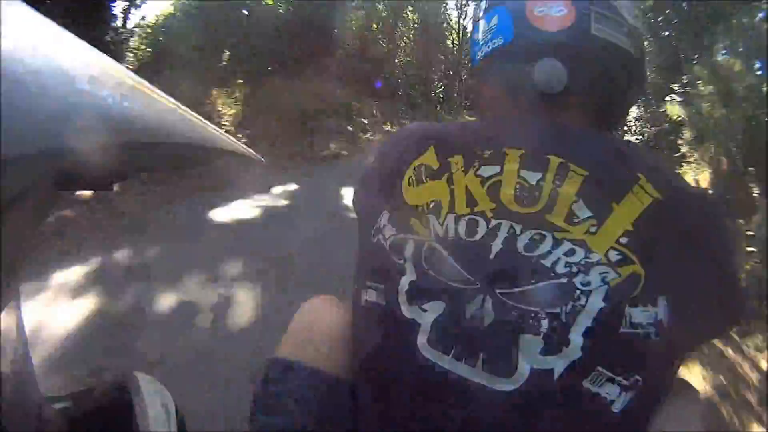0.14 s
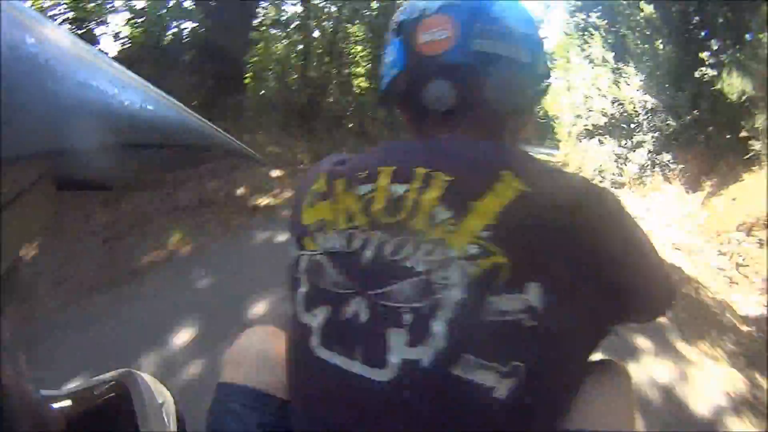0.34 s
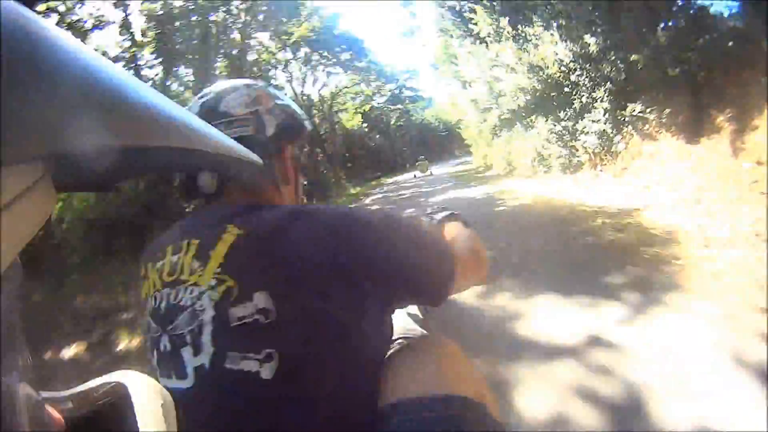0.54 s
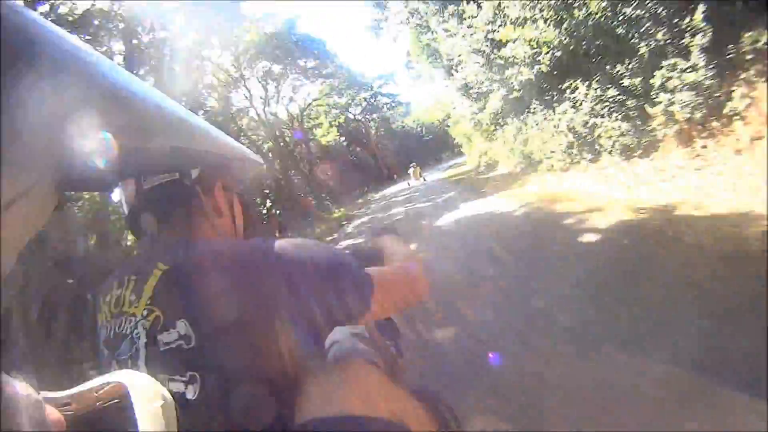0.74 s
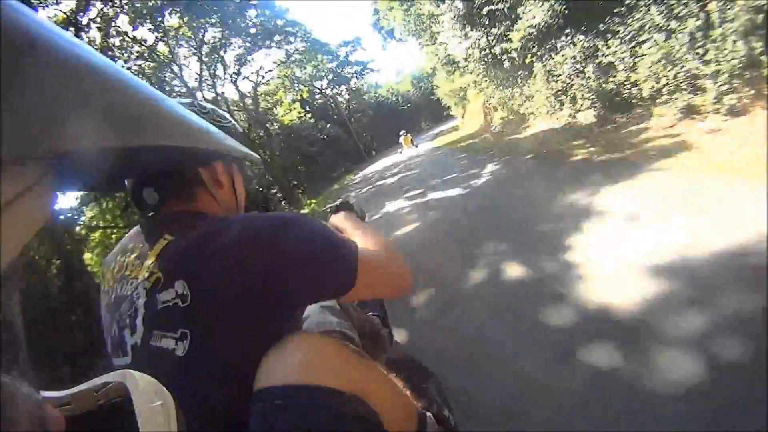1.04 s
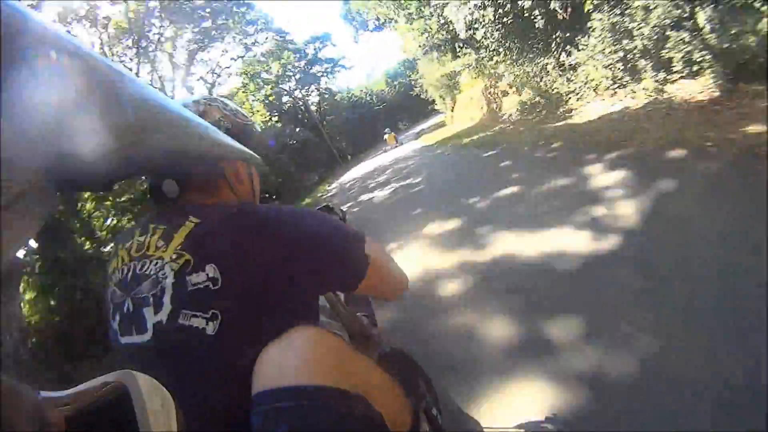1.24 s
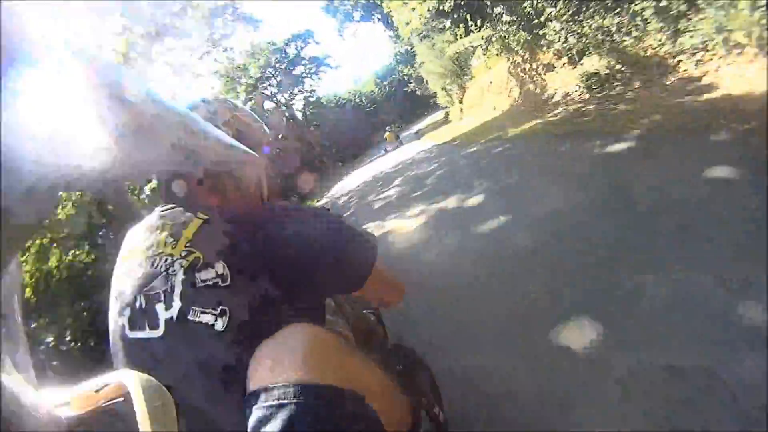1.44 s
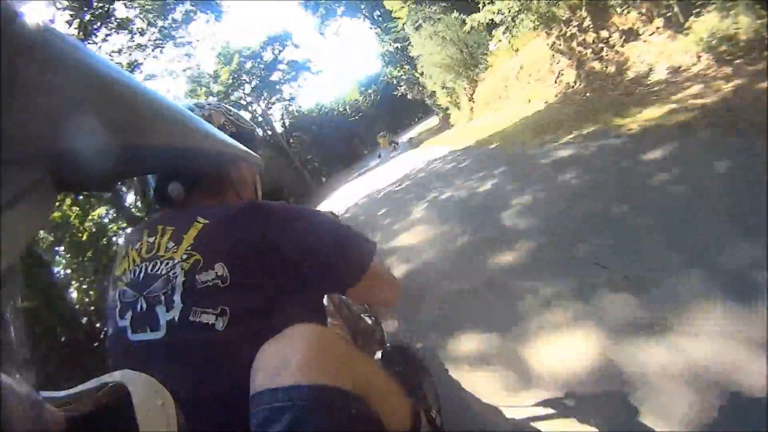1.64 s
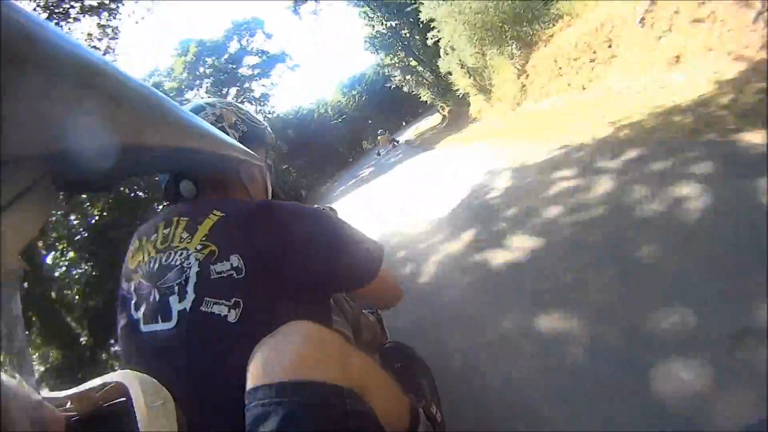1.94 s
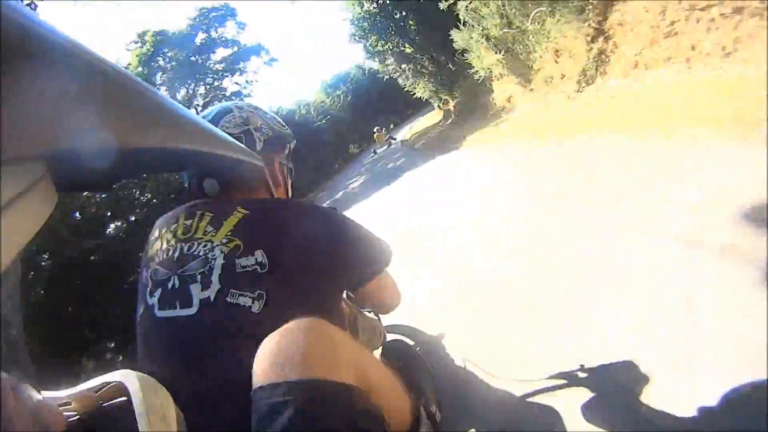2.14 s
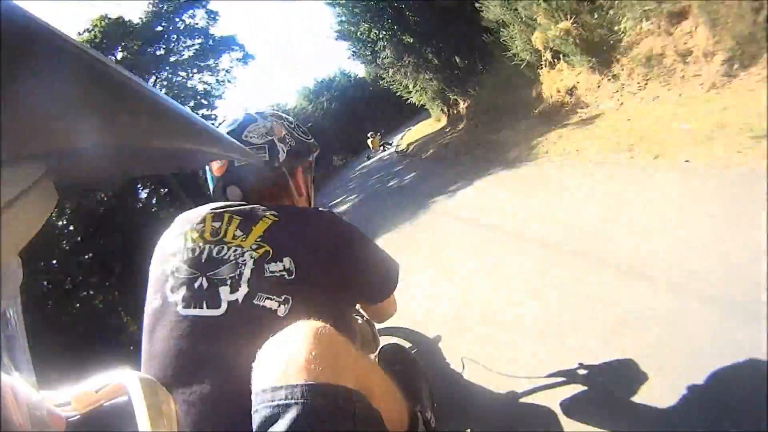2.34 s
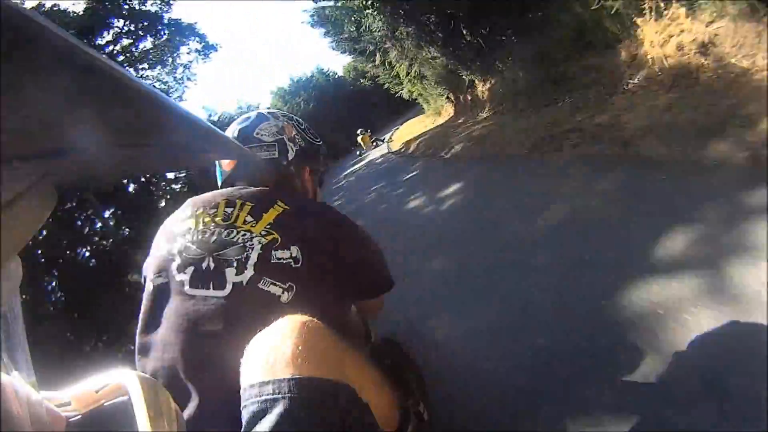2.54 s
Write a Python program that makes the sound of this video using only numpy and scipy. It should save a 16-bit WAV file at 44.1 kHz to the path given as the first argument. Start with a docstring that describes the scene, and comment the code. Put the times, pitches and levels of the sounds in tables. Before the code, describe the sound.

Hard wheels of a small trike roll fast on pavement throughout, a dense, nasal, gritty mid-range roar heard right at the frame outdoors. Hollow knocks cluster at 0.2-0.4 s; bright grit ticks scatter at 0.5-0.75 s as the high whine and hiss grow. Low frame rumble and drone swell around 0.9 s. Strong knocks return at 1.8-2.1 s, a faint one at 2.4 s, over gusty wind and deep wavering sway.

```python
"""A small trike with hard plastic wheels rolls fast down a paved road, heard from a microphone pair on its frame.
Road grit shakes wheels, frame and housing: random contacts through broad resonances give roar and high whine.
Bumps knock the mount with jolts, snaps and hollow rings; loose grit ticks in short noise bursts.
Behind them the frame rumbles, drones and hums, the mount sways as a low tone, and noise bands
make the wind in each port."""
import sys
import numpy as np
from scipy import signal
from scipy.io import wavfile

SR = 44100
rng = np.random.default_rng(int(sys.argv[2]) if len(sys.argv) > 2 else 0)


def dump_mix(stems):
    """Bounce the given channels to the path in sys.argv[1] as a 16-bit WAV at rate SR."""
    frames = np.atleast_2d(stems).T  # one column per channel
    limited = np.clip(frames, -1, 1)  # hard clip at full scale
    pcm = np.round(limited * 32767).astype(np.int16)
    wavfile.write(sys.argv[1], SR, pcm)


N = 119070


def from_db(db):
    """Decibels to gain."""
    return 10 ** (np.asarray(db) / 20)


def rms_one(x):
    """Scales to unit rms."""
    return x / np.sqrt(np.mean(np.abs(x) ** 2) + 1e-20)


def over_time(rows):
    """Columns of a table as curves over time, straight between the rows."""
    seconds, *columns = np.transpose(rows)
    return [np.interp(np.arange(N) / SR, seconds, column) for column in columns]


def drift(rate_hz):
    """Slow random curve of spread 1: noise through two equal low-pass poles at rate_hz."""
    step = 40  # samples between the points of the curve
    pole = np.exp(-2 * np.pi * rate_hz * step / SR)
    noise = rng.standard_normal(N // step + 2002)
    slow = signal.lfilter([1], [1, -2 * pole, pole * pole], noise)[2000:]  # settled part only
    return np.interp(np.arange(N) / step, np.arange(len(slow)), rms_one(slow))


def band_pass(low_hz, high_hz, x):
    """Keeps one band of a sound."""
    return signal.sosfilt(signal.butter(2, [low_hz, high_hz], "band", fs=SR, output="sos"), x)


def add(out, start_s, sound):
    """Adds a stereo sound at a time."""
    i = int(start_s * SR)
    out[:, i:i + sound.shape[1]] += sound


SETTLE = 8000  # samples of grit played before the sound begins
GRIT_PER_S, GRIT_SPREAD_DB = 9000, 2.32


def grit():
    """Dense random road contacts of uneven size and either sign."""
    count = N + SETTLE
    size_db = GRIT_SPREAD_DB * np.minimum(rng.exponential(1, count), 5)
    contacts = from_db(size_db) * rng.choice([-1, 1], count)
    return contacts * (rng.random(count) < GRIT_PER_S / SR)


def resonate(hz, width_hz):
    """Grit through a resonance applied twice, as a complex signal of rms 1."""
    pole = np.exp((2j * np.pi * hz - np.pi * width_hz) / SR)
    return rms_one(signal.lfilter([1], [1, -2 * pole, pole * pole], grit())[SETTLE:])


def shaken(modes, level_db, patchy_db, flicker_hz, alike, damped=0.):
    """Both ports hear each resonance with their own gain and phase; strong swings are damped more.

    patchy_db is the spread of each of two level drifts, one common to all resonances and one of its own;
    alike is the share of the left sound that the right port hears, 1 being all of it."""
    out, together = np.zeros((2, N)), drift(flicker_hz)
    for hz, width_hz, left_db, right_db, lead in modes:
        left = resonate(hz, width_hz)
        left = rms_one(left / (np.abs(left) + .2) ** damped)
        right = left * np.exp(1j * lead)
        if alike < 1:
            right = alike * right + np.sqrt(1 - alike ** 2) * resonate(hz, width_hz)
        patches = from_db(patchy_db * (together + drift(flicker_hz)))
        gain = np.sqrt(2) * patches  # the real part alone has half the power
        out += [from_db(left_db) * gain * left.real, from_db(right_db) * gain * right.real]
    return out * from_db(level_db)


# Wind at the microphone ports, shape of its spectrum.
# Each row: frequency in Hz, relative density in dB per Hz.
WIND_SPECTRUM = [(59, -45), (100, -17.5), (765, -19), (1090, -28.5), (1550, 0.5), (1840, -28.5),
                 (4200, -24.5), (5000, -34.5), (10700, -65), (13900, -89), (22000, -120)]
WIND_DB, WIND_GUST_DB = -27, 1.87
WIND_FOLLOWS = 0.42  # share of the drone's swing in dB


def wind(drone_db):
    """Half-octave bands of noise, unrelated in the two ports, gusting and partly following the drone's level."""
    out, together = np.zeros((2, N)), drift(21)
    edges = 128 * 2 ** np.arange(0, 6.6, .5)
    white = rng.standard_normal((2, 2, N))  # neighbouring bands use different noise
    hz, density_db = np.transpose(WIND_SPECTRUM)
    for k, (low, high) in enumerate(zip(edges, edges[1:])):
        level_db = np.interp(np.log(low * high) / 2, np.log(hz), density_db)
        gust_db = WIND_GUST_DB * (together + drift(36))
        out += from_db(level_db + gust_db) * band_pass(low, high, white[k % 2])
    follow_db = WIND_FOLLOWS * (drone_db - drone_db.mean())
    return from_db(WIND_DB + follow_db) * rms_one(out)


# The microphone mount swaying on its stem.
# Each row: time in seconds, centre of the wavering pitch in Hz, level in dB.
MOUNT_SWAY = [(0.0, 29.7, -37), (0.06, 30.0, -29), (0.23, 31.4, -39), (0.31, 29.0, -32), (0.46, 28, -35),
              (0.52, 28.9, -46), (0.92, 29.3, -36), (0.98, 29.5, -44), (1.17, 29.4, -33), (1.28, 31.2, -49),
              (1.45, 33.6, -32.5), (1.53, 30.1, -35.5), (1.67, 30.2, -29.5), (1.8, 26.6, -31),
              (2.0, 26.4, -25.5), (2.15, 32.3, -37.5), (2.49, 31.5, -28.5), (2.7, 34.3, -39)]
SWAY_WAVER_HZ, SWAY_LEAD = 1.2, .2  # spread of the pitch; radians by which the right port leads


def sway():
    """The mount on its stem: a low, nearly pure tone that wavers in pitch."""
    hz, level_db = over_time(MOUNT_SWAY)
    phase = 2 * np.pi * np.cumsum(hz + SWAY_WAVER_HZ * drift(8.3)) / SR
    return np.sqrt(2) * from_db(level_db) * np.sin(phase + np.array([[0], [SWAY_LEAD]]))


# How hard the frame under the microphones is shaken.
# Each row: time in seconds, hum in dB, hollow drone in dB, low rumble in dB.
FRAME_LEVELS = [(0.0, -37, -38, -35), (0.12, -47, -39.5, -49), (0.17, -37.5, -40, -45),
                (0.42, -43.5, -36, -43), (0.56, -48, -41, -54), (0.62, -65, -40.5, -58),
                (0.66, -32.5, -34, -44.5), (0.91, -30, -30.5, -32.5), (1.09, -40, -34, -46),
                (1.12, -29.5, -38, -33), (1.17, -35, -33, -37), (1.21, -31, -37.5, -56),
                (1.27, -39.5, -32.5, -43.5), (2.04, -36.5, -32, -36.5), (2.32, -37, -34.5, -43),
                (2.41, -35.5, -30.5, -32), (2.63, -36.5, -32, -47.5), (2.7, -51, -31, -36)]


def frame_levels():
    """Level curves of hum, drone and rumble."""
    return over_time(FRAME_LEVELS)


# Lowest resonances of the frame, as the two ports hear them.
# Each row: centre in Hz, width in Hz, left gain in dB, right gain in dB, lead of the right in radians.
RUMBLE_MODES = [(52.4, 32, -8, -8, .2), (76.4, 20, -0.5, -0.5, 0.27), (103, 20, -4.5, -4.5, 0.4)]


def rumble(level_db):
    """Low frame resonances shaken by grit, nearly alike in both ports."""
    return shaken(RUMBLE_MODES, level_db, patchy_db=0.2, flicker_hz=9.6, alike=0.98, damped=0.47)


# Hollow resonances of the frame, at the two ports.
# Each row: centre in Hz, width in Hz, left gain in dB, right gain in dB, lead of the right in radians.
DRONE_MODES = [(224, 43, -10, -7, 2.8), (328, 105, -3.5, 3.5, 2.5), (602, 97, -17.5, -5, -1.5)]


def drone(level_db):
    """Hollow frame resonances shaken by grit, partly different in the two ports."""
    return shaken(DRONE_MODES, level_db, patchy_db=1.1, flicker_hz=14, alike=0.68, damped=0.19)


# Humming resonances of the frame, at the two ports.
# Each row: centre in Hz, width in Hz, left gain in dB, right gain in dB, lead of the right in radians.
HUM_MODES = [(135.3, 27, -12, -1, 1.7), (159.8, 43.5, 0, 3.5, 1.46)]


def hum(level_db):
    """Two neighbouring frame resonances shaken by grit."""
    return shaken(HUM_MODES, level_db, patchy_db=1.06, flicker_hz=9.8, alike=0.97, damped=0.31)


# Loose grit ticking on the frame.
# Each row: start in seconds, level in dB before the common lift and the band filter.
GRIT_TICKS = [(0.5212, -15), (0.6433, -33), (0.6625, -16.5), (0.706, -21), (0.7336, -21), (1.5443, -27),
              (2.119, -25)]
TICK_DECAY_S, TICK_RISE_S, TICK_LIFT_DB = 0.0038, 0.0013, 2


def ticks():
    """Loose grit on the frame: short bright noise bursts, unrelated in the two ports."""
    out, t = np.zeros((2, N + SR)), np.arange(1500) / SR
    envelope = np.exp(-t / TICK_DECAY_S) * np.minimum(t / TICK_RISE_S, 1)
    for start_s, level_db in GRIT_TICKS:
        noise = rng.standard_normal((2, 1500))
        add(out, start_s, from_db(level_db + TICK_LIFT_DB) * noise * envelope)
    return band_pass(3470, 7000, out[:, :N])


def ring(hz, t60_s):
    """A sine starting at zero, its envelope falling from 1 by 60 dB in t60_s."""
    t = np.arange(SR // 5) / SR
    return np.sin(2 * np.pi * hz * t) * from_db(-60 * t / t60_s)


# Bumps in the road that knock the microphone mount.
# Each row: start in seconds, hollow ring strength in dB, ring pitch in Hz, jolt in dB, snap in dB.
BUMPS = [(.228, -12, 297, -14, -27), (.332, -8, 285, -9, -11), (.373, -15, 312, -20, -22),
         (.4155, -4.5, 288, -12, -16), (1.8386, -4, 315, -5, -22), (1.991, -9.5, 258, -20, -28),
         (2.0413, -8, 298, -3, -22), (2.118, -16, 250, -20, -22), (2.38, -19, 304, -22, -27)]
RING_SWELL_S, RING_T60_S, RING_LEFT_DB = 0.0037, 0.042, -4.5
JOLT_S, JOLT_RIGHT_DB = .0011, -5
SNAP_HZ, SNAP_T60_S = 800, .018


def knocks():
    """Each bump jolts the ports against each other, snaps, and a hollow ring swells up, stronger on the right."""
    out, t = np.zeros((2, N + SR)), np.arange(SR // 5) / SR
    pulse = np.sin(np.pi * np.minimum(t / JOLT_S, 1)) ** 2
    jolt = pulse * np.array([[-1], [from_db(JOLT_RIGHT_DB)]])
    snap = -ring(SNAP_HZ, SNAP_T60_S)
    swell = np.minimum(t / RING_SWELL_S, 1) ** 2
    for start_s, ring_db, hz, jolt_db, snap_db in BUMPS:
        hollow = ring(hz, RING_T60_S) * swell * from_db([[RING_LEFT_DB], [0]])
        add(out, start_s, from_db(ring_db) * hollow + from_db(jolt_db) * jolt + from_db(snap_db) * snap)
    return out[:, :N]


# How hard the bright resonances are shaken.
# Each row: time in seconds, whine in dB, hiss in dB, both before the scraping is added.
BRIGHT_LEVELS = [(0.0, -40.5, -46), (0.33, -40, -51), (0.48, -39, -44.5), (0.67, -31.5, -41.5),
                 (0.85, -34.5, -46), (1.01, -36, -46.5), (1.26, -35.5, -46.5), (1.56, -30.5, -42),
                 (1.74, -31.5, -44.5), (1.95, -33.5, -45.5), (2.34, -32, -42.5), (2.7, -32.5, -48.5)]
SCRAPE_DB, SCRAPE_HZ = 1.5, 64  # spread and rate


def bright_levels():
    """Level curves of whine and hiss, which share one fast scraping."""
    whine_db, hiss_db = over_time(BRIGHT_LEVELS)
    scrape_db = SCRAPE_DB * drift(SCRAPE_HZ)
    return whine_db + scrape_db, hiss_db + scrape_db


# Broad resonances of the hiss, at the two ports.
# Each row: centre in Hz, width in Hz, left gain in dB, right gain in dB, lead of the right in radians.
HISS_MODES = [(5986, 1250, 5, -2.5, 1.4), (7240, 1600, -4, -1.5, 1.3), (8900, 620, -11, -11, 1.7),
              (10670, 4300, -15.5, -14, .4)]


def hiss(level_db):
    """The highest resonances shaken by grit, mostly different in the two ports."""
    return shaken(HISS_MODES, level_db, patchy_db=0.84, flicker_hz=13, alike=0.41)


# The resonance of the high whine, at the two ports.
# Each row: centre in Hz, width in Hz, left gain in dB, right gain in dB, lead of the right in radians.
WHINE_MODES = [(4995, 640, 2.2, -0.04, 0.56)]


def whine(level_db):
    """One broad high resonance shaken by grit, the same in both ports but for gain and phase."""
    return shaken(WHINE_MODES, level_db, patchy_db=0.5, flicker_hz=10, alike=1)


# How hard the road shakes the roaring resonances.
# Each row: time in seconds, roar in dB, upper roar in dB.
ROAR_LEVELS = [(0.0, -19, -27), (0.43, -16.5, -29.5), (1.06, -17, -27.5), (1.21, -17, -27.5),
               (1.65, -18, -27), (1.95, -18, -27.5), (2.33, -16, -28), (2.7, -17.5, -27.5)]


def roar_levels():
    """Level curves of roar and upper roar."""
    return over_time(ROAR_LEVELS)


# Resonances above the main roar, at the two ports.
# Each row: centre in Hz, width in Hz, left gain in dB, right gain in dB, lead of the right in radians.
UPPER_ROAR_MODES = [(2180, 330, -1, -9, -1), (2475, 320, -2.5, -1, -2.0), (2832, 420, -6, -1.5, -2.5),
                    (3242, 260, -9, -10.5, -1.5), (3940, 640, -11.5, -9.5, 2.5)]


def upper_roar(level_db):
    """Broad resonances above the main roar, shaken by grit and flickering fast."""
    return shaken(UPPER_ROAR_MODES, level_db, patchy_db=0.77, flicker_hz=36, alike=0.93)


# Resonances of the main roar, at the two ports.
# Each row: centre in Hz, width in Hz, left gain in dB, right gain in dB, lead of the right in radians.
ROAR_MODES = [(982, 122, -19, -41.5, -5.4), (1428, 208, -6, -12, 0.57), (1530.4, 201, 0, -3, -0.35),
              (1649, 147, -7, -10, -0.58), (1981, 180, -9.5, -18.5, -0.63)]


def roar(level_db):
    """The main resonances shaken by grit, the same in both ports but for gain and phase."""
    return shaken(ROAR_MODES, level_db, patchy_db=0.35, flicker_hz=15, alike=1, damped=.2)


def scene():
    """All sources at the two ports, from the background to the roar."""
    hum_db, drone_db, rumble_db = frame_levels()
    whine_db, hiss_db = bright_levels()
    roar_db, upper_db = roar_levels()
    background = wind(drone_db) + sway()
    frame = rumble(rumble_db) + drone(drone_db) + hum(hum_db)
    hits = ticks() + knocks()
    bright = hiss(hiss_db) + whine(whine_db)
    return background + frame + hits + bright + upper_roar(upper_db) + roar(roar_db)


TOP = 3.9  # height that rounded peaks approach
CUTOFF_HZ = 11000


def record(dry):
    """The microphone input rounds peaks, then a steep low-pass cuts the top."""
    rounded = TOP * np.tanh(dry / TOP)
    low_pass = signal.ellip(14, .5, 85, CUTOFF_HZ, fs=SR, output="sos")  # ripple and stop-band depth in dB
    return signal.sosfilt(low_pass, rounded)


dry = scene()
out = record(dry)
dump_mix(out)
```